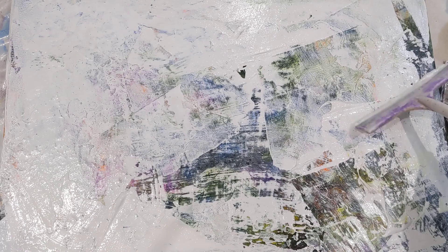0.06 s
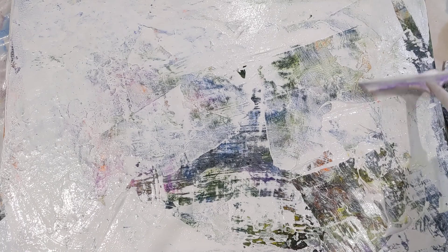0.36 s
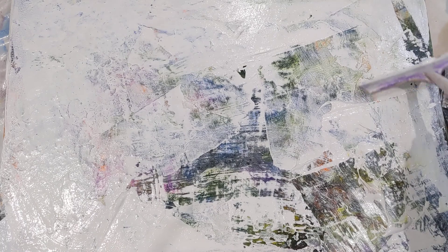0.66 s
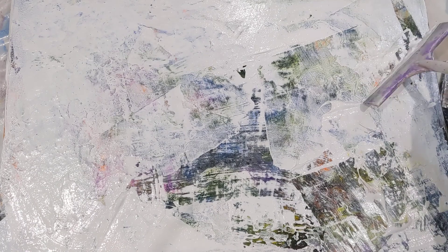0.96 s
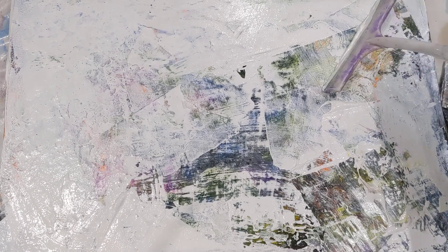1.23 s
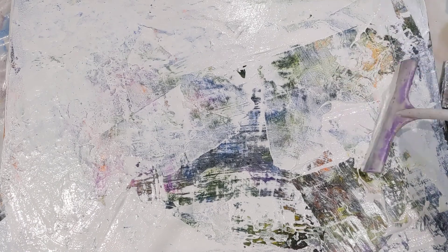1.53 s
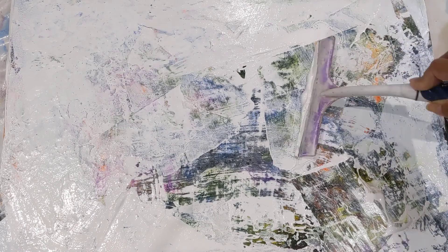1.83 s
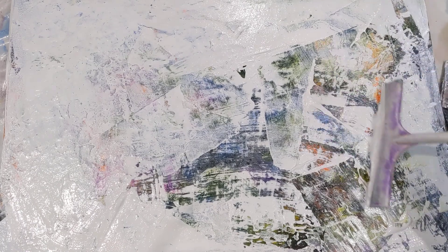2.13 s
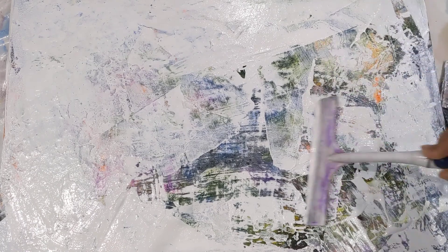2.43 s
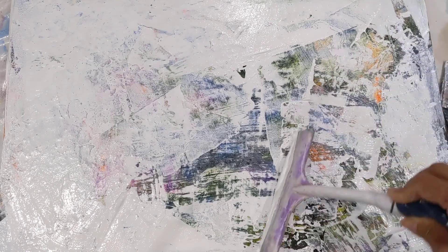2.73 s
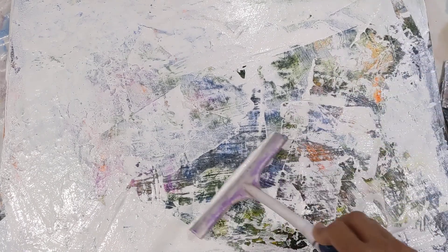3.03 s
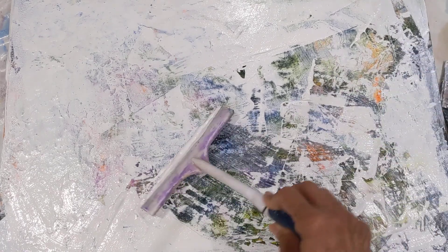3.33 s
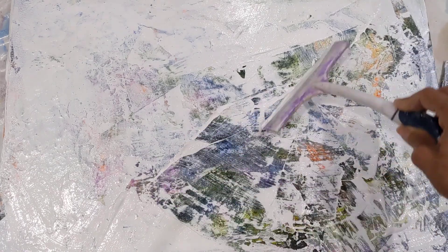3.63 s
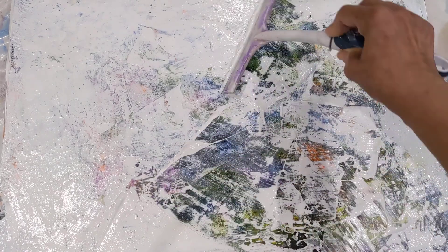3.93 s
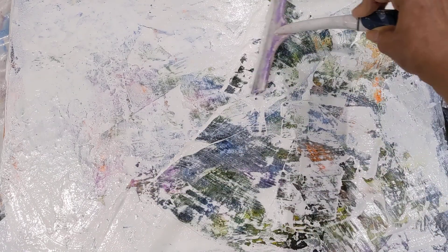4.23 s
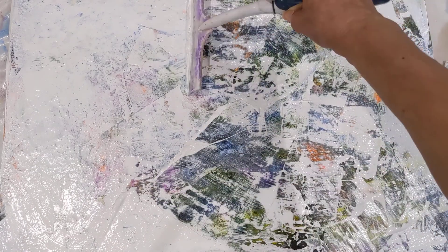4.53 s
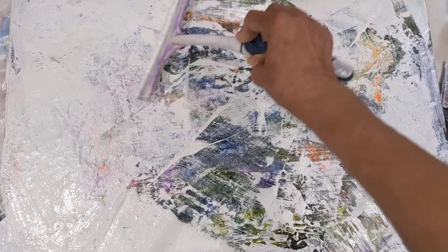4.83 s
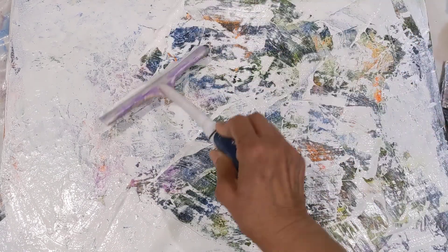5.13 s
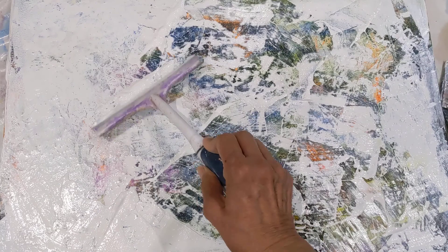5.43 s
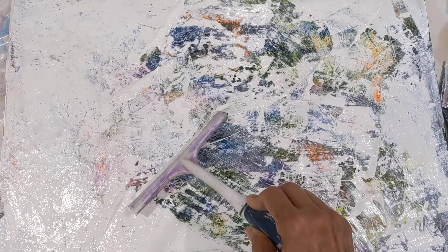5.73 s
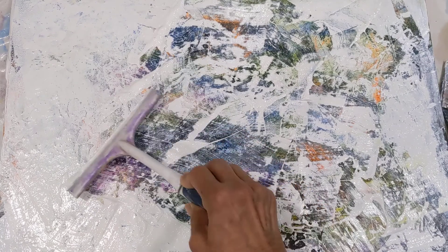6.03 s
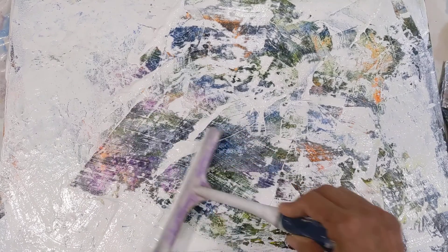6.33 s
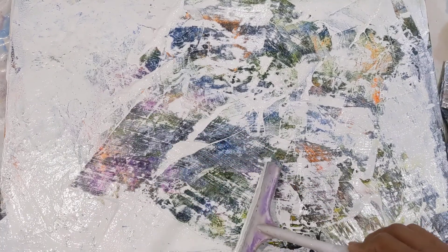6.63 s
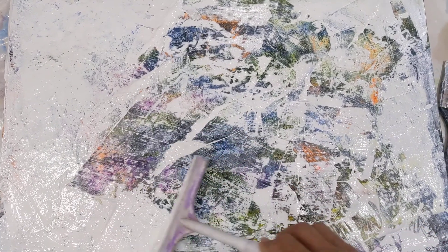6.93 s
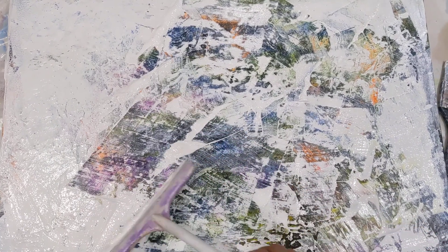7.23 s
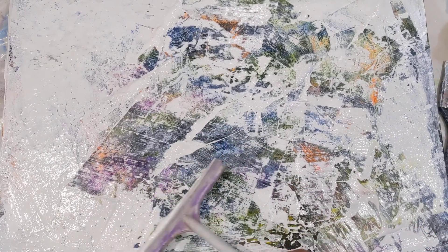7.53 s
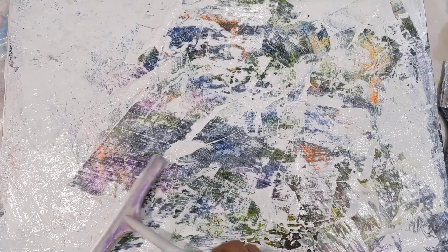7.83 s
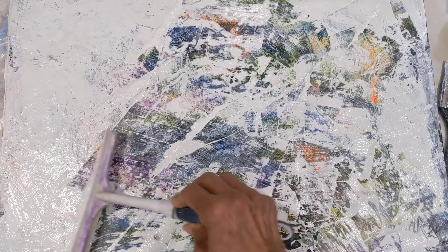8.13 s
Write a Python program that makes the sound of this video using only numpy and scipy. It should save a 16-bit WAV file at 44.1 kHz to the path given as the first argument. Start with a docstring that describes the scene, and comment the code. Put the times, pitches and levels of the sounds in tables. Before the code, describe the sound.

A plastic squeegee drags wet paint over a stretched canvas in quick, uneven strokes, close to the microphone in a small room. Each pull has a gritty rasp, a wet fizz and a low drum-like rumble, with lighter return strokes between. Small snaps and ticks appear from the middle on. Late on, a sharp knock and a second thump come from the canvas, then softer scrapes follow. A lamp buzzes very faintly.

```python
"""Quick, wet scrapes, close by in a small room: a plastic squeegee drags gesso over a stretched canvas.
Stick-slip friction on ridges of paint rings the blade and drives the canvas like a drumhead, while
crushed grit rasps and the tearing wet film fizzes. Paint snaps, and twice the canvas is pushed hard
and thumps on its frame. Behind it all a lamp buzzes faintly at harmonics of twice the mains frequency."""
import sys
import numpy as np
from scipy import signal
from scipy.fft import rfft, irfft
from scipy.io import wavfile
from scipy.ndimage import uniform_filter1d, map_coordinates

SR = 44100
rng = np.random.default_rng(int(sys.argv[2]) if len(sys.argv) > 2 else 0)


def unload_audio(sound):
    """Save the sound as a 16-bit wav file, at the path given as the first command line argument."""
    columns = np.transpose(np.atleast_2d(sound))
    # keep every value between -1 and 1, then stretch to whole-number steps
    steps = np.round(np.clip(columns, -1, 1) * 32767)
    wavfile.write(sys.argv[1], SR, steps.astype(np.int16))


N = 368676
TIME = np.arange(N) / SR
SIDES = np.array([[1], [-1]])  # left, right


def undb(db):
    """Amplitude ratio of a level in decibels."""
    return 10 ** (np.asarray(db) / 20)


def unit(x):
    """Normalisation to unit rms."""
    return x / np.sqrt(np.mean(x ** 2))


def highpass(x, hz):
    """Fourth-order Butterworth high-pass."""
    return signal.sosfilt(signal.butter(4, hz, "high", fs=SR, output="sos"), x)


def colour(x, points):
    """Minimum-phase filter through (frequency [Hz], gain [dB]) points, by folding the cepstrum."""
    size = 4096
    hz, db = np.transpose(points)
    bin_hz = np.arange(size // 2 + 1) * SR / size
    gain = undb(np.interp(np.log(bin_hz + 1), np.log(hz), db))
    cepstrum = irfft(np.log(gain))
    cepstrum[1:size // 2] *= 2
    cepstrum[size // 2 + 1:] = 0
    return signal.oaconvolve(x, irfft(np.exp(rfft(cepstrum))))[:len(x)]


def ring(modes):
    """Modal impulse response: a sum of damped sinusoids."""
    t = TIME[:SR // 2]
    return sum(undb(db) * np.sin(2 * np.pi * hz * t) * np.exp(-np.log(1000) * t / t60)
               for hz, db, t60 in modes)


def add(out, s, x, db):
    """Superposition of x on the track at time s, with peak level db."""
    start = int(s * SR)
    out[start:start + len(x)] += (x * undb(db) / np.abs(x).max())[:N - start]


def clicks(per_s, spread_db=3):
    """Poisson impulses, many small and a few large."""
    occurs = rng.random(N) < per_s / SR
    size = np.minimum(rng.exponential(size=N), 4)
    return occurs * undb(spread_db * size) * rng.choice([-1, 1], N)


def steady(x, span_s):
    """Running rms normalisation: the hand evens the force over span_s; faster unevenness stays."""
    width = int(span_s * SR)
    power = uniform_filter1d(uniform_filter1d(x ** 2, width), width)
    return x / np.sqrt(np.abs(power) + 1e-4 * power.mean())


# spectrum of the quiet room: (frequency [Hz], relative level [dB])
AIR_SPECTRUM = [(18, -70.5), (30, -9), (59, 10), (88, -0.5), (324, -1), (389, -4), (808, -11.5),
                (1050, -15.5), (1440, -14.5), (1910, -15.5), (2550, -16), (3150, -14), (3590, -22),
                (3880, -18), (15500, -29.5)]


def room_air():
    """Partly coherent noise, more alike on the two sides at low frequencies."""
    mid, side = (colour(rng.standard_normal(N), AIR_SPECTRUM) for _ in range(2))
    side = colour(side, [(100, -3), (600, -9), (1300, 1), (15000, 0.5)])
    return undb(-62.5) * (mid + side * SIDES) / np.std(mid)


# partials of the lamp: (nominal frequency [Hz], relative level [dB])
LAMP_PARTIALS = [(1680, -82), (1798, -80), (2401, -79), (2519, -77), (2638, -79), (2762, -84), (2998, -80),
                 (3483, -79), (3720, -84), (4081, -79), (4441, -90), (4560, -83), (4802, -88), (5163, -87),
                 (5281, -90), (6002, -89)]


def lamp_buzz():
    """Harmonics of twice the mains frequency, in quadrature between the two sides."""
    buzz, fundamental_hz = 0, 120
    for hz, db in LAMP_PARTIALS:
        harmonic_hz = fundamental_hz * round(hz / fundamental_hz)
        phase = 2 * np.pi * rng.random() + SIDES * rng.choice([-1, 1]) * np.pi / 4
        buzz += undb(db) * np.sin(2 * np.pi * harmonic_hz * TIME + phase)
    return undb(6.5) * buzz


# spectrum of the reflections: (frequency [Hz], gain [dB])
REFLECTIONS = [(300, -17.5), (420, -23), (530, -39), (660, -1.5), (1000, -4), (2000, -3), (3500, 3),
               (7000, -0.5), (15000, -3.5)]
# excess of the left side over the right: (frequency [Hz], gain [dB])
LEFT_EXCESS = [(1000, 1), (4500, 2), (7000, 0.5), (9500, 7.5), (11500, 8), (16000, 17)]
# effect of the blade's position: (time [s], left lag [ms], edge gain [dB], frame gain [dB])
BLADE_PATH = [(0, -0.15, -2, -2.5), (1.8, -0.095, -6.5, -9.5), (3.2, -0.0018, -16, -13.5),
              (3.9, 0.054, 0, -39), (4.7, -0.0014, -10, -28), (6, 0.12, -2.5, -22.5), (7, 0.16, -20, -29),
              (8.36, 0.17, -3, -15)]


def small_room(x, t60_s, wet_db):
    """Unequal paths delay the direct sound between the sides; diffuse reflections follow."""
    path_s, lag_ms, *_ = np.transpose(BLADE_PATH)
    lag = np.interp(TIME, path_s, lag_ms) * SR / 1000
    t = TIME[:SR // 2]
    walls, table = np.exp(-np.log(1000) * t / t60_s), np.exp(-t / 0.0045)
    fade = (t > .0015) * (walls + table)
    channels = []
    for side in (1, -1):
        direct = map_coordinates(x, [np.arange(N) - side * lag / 2], order=3)
        tail = unit(rng.standard_normal(len(t)) * fade) / np.sqrt(len(t))
        tail = highpass(colour(tail, REFLECTIONS), hz=119)
        heard = direct + undb(wet_db) * signal.fftconvolve(x, tail)[:N]
        channels.append(colour(heard, [(hz, side * db / 2) for hz, db in LEFT_EXCESS]))
    return np.array(channels)


# paint snaps and plastic ticks: (time [s], peak level [dB], centre [Hz], bandwidth [Hz], decay [ms])
PAINT_SNAPS = [(3.045, -41.5, 11800, 4000, 8), (3.544, -46.5, 7880, 11000, 4.9),
               (3.596, -45, 7960, 11000, 5), (3.945, -38.5, 3200, 3000, 14), (3.979, -36, 10000, 8000, 1.5),
               (4.889, -40, 9300, 5000, 4.7), (5.260, -42, 5700, 1800, 1.8), (5.261, -40, 2460, 2000, 3.8),
               (5.344, -36, 10000, 5000, 1.6), (5.553, -31.5, 6900, 11800, 2),
               (5.554, -35.5, 2270, 1500, 2.4), (5.946, -37.5, 11400, 4000, 4.4),
               (6.042, -33.5, 5200, 4000, 1.8), (6.167, -36.5, 2440, 1200, 1.8),
               (6.52, -25, 6900, 11000, 7.5), (6.527, -21.5, 2530, 2160, 3.6),
               (6.531, -26.5, 895, 1150, 14), (6.954, -25.5, 4400, 4500, 1.3),
               (7.095, -36.5, 12000, 6000, 3), (7.797, -43, 11100, 9000, 2.7)]


def snaps():
    """Transient excitation: a click and its brief crackle pass through a resonance."""
    out, t_ms = np.zeros(N), TIME[:SR // 5] * 1000
    for s, db, hz, width_hz, decay_ms in PAINT_SNAPS:
        burst = rng.standard_normal(len(t_ms)) * np.exp(-t_ms / decay_ms)
        burst[0] = 7  # the click
        resonance = signal.iirpeak(hz, hz / width_hz, fs=SR)
        add(out, s, signal.lfilter(*resonance, signal.lfilter(*resonance, burst)), db)
    return out


# modes of the slack canvas: (frequency [Hz], relative level [dB], T60 [s])
CANVAS_MODES = [(66, -16.5, 0.48), (78, -7, 0.18), (142.8, -1.5, 0.15), (149.1, -9, 0.39),
                (180.8, -4.5, 0.25), (208.7, -1.5, 0.13), (240, -13.5, 0.092), (335.4, 3.5, 0.064),
                (402, -12.5, 0.057), (443, 4.5, 0.081)]
# the canvas bumps its frame or springs back: (time [s], peak level [dB], contact time [ms])
CANVAS_THUMPS = [(0.515, -40, 4.2), (0.751, -44, 1.6), (0.809, -49, 3.8), (0.851, -41, 6.7),
                 (1.166, -32.5, 1.55), (2.273, -46.5, 2.5), (2.575, -41, 3.7), (5.36, -34, 2.6),
                 (6.102, -31.5, 2.8), (6.529, -11.5, 0.87), (6.543, -7.5, 2.5), (6.558, -18.5, 8.5),
                 (7.022, -14, 1.9), (7.034, -19, 1.75), (7.056, -19.5, 4.7), (7.143, -24, 2.9)]


def thumps():
    """Impact on a membrane: the longer the half-sine push, the duller the thud."""
    out = np.zeros(N)
    canvas = highpass(ring(CANVAS_MODES), hz=70.5)  # the open back cancels the deep bass
    for s, db, contact_ms in CANVAS_THUMPS:
        push = np.sin(np.pi * np.minimum(TIME[:SR // 20] * 1000 / contact_ms, 1))
        add(out, s, signal.fftconvolve(push, canvas), db)
    return out


def canvas_rumble(slips, pressure):
    """Forced vibration of a membrane: pressure raises its tension and so the pitch of every mode."""
    # soft paint passes only the slow part of each jerk
    force = colour(slips, [(40, -17), (70, -7), (130, 8), (220, 9), (450, -7), (1500, -53)])
    pitch_ratio = 0.87 + 0.254 * pressure
    phase_per_hz, out = 2 * np.pi * np.cumsum(pitch_ratio) / SR, 0
    for hz, db, t60 in CANVAS_MODES:
        phasor = np.exp(1j * hz * phase_per_hz)
        pole = np.exp(-np.log(1000) / (t60 * SR))
        out += undb(db) * (phasor * signal.lfilter([1], [1, -pole], force / phasor)).imag
    return steady(out, span_s=0.067)


# damped modes of the squeegee's body and thin edge: (frequency [Hz], relative level [dB], T60 [s])
BODY_MODES = [(447, -23, 0.031), (476.3, 12.5, 0.046), (503, 6.5, 0.057), (1020, -38, 0.045),
              (1062, -16, 0.086), (1183, -19, 0.043), (1550, -28, 0.076)]
EDGE_MODES = [(559.3, 26, 0.042), (603, 12, 0.085), (720, -38, 0.034)]
# spectrum of crushed grit: (frequency [Hz], relative level [dB])
GRIT_SPECTRUM = [(400, -15), (800, -2), (1400, 4.5), (2000, -2.5), (2800, -3.5), (4000, -14.5), (6000, -15),
                 (10000, -23), (16000, -15.5)]
# the blade catches on a ridge: (time [s], relative peak level [dB], chatter decay [ms])
RIDGE_CATCHES = [(0.094, -31, 0.95), (0.739, -23.5, 3), (1.198, -19.5, 1.1), (1.613, -35.5, 2.2),
                 (1.684, -25, 1.7), (1.738, -16.5, 2.1), (1.762, -16, 3.8), (1.808, -24.5, 11),
                 (1.832, -17, 1.9), (1.870, -28, 3), (2.266, -48, 1.4), (2.419, -25, 1.1),
                 (2.553, -17.5, 0.89), (3.165, -22, 2.2), (3.261, -25.5, 2.2), (3.729, -30.5, 0.9),
                 (3.781, -19.5, 4.5), (3.979, -18, 6), (4.147, -39, 2.2), (4.356, -18.5, 0.77),
                 (4.404, -22, 3), (4.782, -33, 1.3), (4.885, -15, 1.4), (4.952, -24.5, 1.4),
                 (5.251, -39, 3.4), (5.345, -15, 0.3), (5.492, -40, 1.7), (5.7, -40.5, 2.2),
                 (6.046, -18, 2.9), (6.067, -13, 3.8), (7.8, -37, 4.5)]


def catches():
    """Resonant chatter: eight fading slips in step with the blade's ring crack grit and shake canvas."""
    out, canvas = np.zeros(N), ring(CANVAS_MODES)
    blade = highpass(ring(BODY_MODES) + undb(-18) * ring(EDGE_MODES), hz=183)
    t = TIME[:len(blade)]
    for s, db, chatter_ms in RIDGE_CATCHES:
        slips = np.zeros(SR // 20)
        slip_s = np.arange(8) * rng.uniform(.0019, .0022)
        slips[(slip_s * SR).astype(int)] = np.exp(-slip_s * 1000 / chatter_ms)
        crack = colour(rng.standard_normal(len(t)) * np.exp(-t / 0.001), GRIT_SPECTRUM)
        response = blade + undb(-12.5) * canvas + undb(-21) * crack
        add(out, s + 0.001047, signal.fftconvolve(slips, response), db - .5)
    return out


def sticking(hold_s, depth):
    """Static friction holds the blade back just before each catch, so the gain dips."""
    held = np.zeros(N)
    for s, *_ in RIDGE_CATCHES:
        held[int((s - hold_s) * SR):int(s * SR)] = 1
    return 1 - depth * uniform_filter1d(held, size=130)


# modes of the wooden frame: (frequency [Hz], relative level [dB], T60 [s])
FRAME_MODES = [(253, -10, 0.045), (332, 11, 0.058), (897, 1.5, 0.038), (975, -7, 0.11)]


def blade_drag(slips):
    """Modal excitation: slips ring the blade, and the frame too when the blade runs near it."""
    path_s, _, *gains_db = np.transpose(BLADE_PATH)
    edge_gain, frame_gain = (undb(np.interp(TIME, path_s, db)) for db in gains_db)
    jerks = highpass(slips, hz=281)
    body, edge, frame = (unit(signal.oaconvolve(jerks, ring(modes)[:SR // 10])[:N])
                         for modes in (BODY_MODES, EDGE_MODES, FRAME_MODES))
    return steady(body + edge_gain * edge + frame_gain * frame, span_s=0.081)


# heavy pulls and light returns, with the relative level of each layer: (time of full pressure [s],
# attack [s], hold [s], release [s], drag [dB], rumble [dB], rasp [dB], fizz [dB])
HAND_STROKES = [(0.0, .05, 0.063, 0.098, -47.5, -41, -57, -64),
                (0.17, 0.046, 0.092, 0.091, -62, -58, -66, -71),
                (0.387, 0.099, .1, 0.039, -50.5, -40, -70, -59.5),
                (0.605, .05, 0.022, .06, -57, -63, -71, -69),
                (0.755, 0.069, 0.065, 0.066, -35.5, -31.5, -58, -58.5),
                (0.949, .06, 0.047, 0.078, -58.5, -55, -69, -68),
                (1.17, 0.091, 0.086, 0.071, -33, -40.5, -53.5, -58),
                (1.435, 0.064, 0.11, .1, -72, -58, -70, -75),
                (1.763, 0.18, 0.095, 0.086, -29.5, -36.5, -50, -58.5),
                (2.498, 0.2, 0.064, 0.09, -31.5, -35, -58, -62.5),
                (2.921, 0.046, 0.33, 0.16, -37.5, -39.5, -52.5, -61),
                (3.552, 0.1, 0.11, 0.18, -56.5, -60.5, -63.5, -69.5),
                (3.789, 0.099, .18, 0.086, -32, -45, -48, -60.5),
                (4.133, 0.1, 0.059, 0.042, -55, -59, -62, -68),
                (4.375, 0.16, 0.15, 0.096, -34, -47, -52, -64.5),
                (4.877, 0.17, 0.053, 0.078, -34.5, -41, -53, -61),
                (5.014, 0.089, 0.049, 0.11, -56, -67, -61, -68),
                (5.116, .05, 0.28, 0.11, -57.5, -54.5, -68, -75.5),
                (5.458, .06, 0.27, 0.12, -62.5, -61, -67.5, -74.5),
                (5.984, 0.13, 0.074, 0.13, -34, -40.5, -47, -62),
                (6.162, 0.077, .06, 0.11, -65, -60, -69, -67),
                (6.362, 0.056, 0.03, 0.14, -59, -69, -64, -68),
                (6.523, 0.049, 0.012, 0.12, -39.5, -27, -45.5, -54),
                (6.898, 0.21, 0.14, 0.14, -37.5, -31.5, -47, -58),
                (7.586, 0.073, .16, 0.034, -52, -47, -58.5, -71.5),
                (7.853, 0.082, 0.032, 0.19, -46.5, -40, -58, -65.5),
                (8.25, 0.18, 0.31, .1, -44.5, -40, -55.5, -65.5)]


def stroke_gain(levels_db, attack_db, push_db, release_db, fade_db_per_s=np.inf):
    """Incoherent strokes add in power: each swells, grows as the hand speeds up, and dies on lifting."""
    t, power = TIME[::64], 0
    ease = 1.33  # above one, the hand eases into and out of full pressure
    for (s, attack_s, hold_s, release_s, *_), db in zip(HAND_STROKES, levels_db):
        before, after = np.maximum(s - t, 0), np.maximum(t - s - hold_s, 0)
        swell = -attack_db * (before / attack_s) ** ease
        push = push_db * (np.clip((t - s) / hold_s, 0, 1) - .5)
        lift = -np.minimum(release_db * (after / release_s) ** ease, fade_db_per_s * (after + 1 / SR))
        power += undb(db + swell + push + lift) ** 2
    return np.interp(TIME, t, np.sqrt(power))


# spectrum of the tearing wet film: (frequency [Hz], relative level [dB])
FILM_SPECTRUM = [(1500, 15.5), (3500, 4.5), (5500, 2), (8000, 1), (10000, 4.5), (11500, 10), (13500, 4),
                 (16000, -28)]


def scrape():
    """Stick-slip friction: the same jerks drive blade and canvas, crush grit and tear the wet film."""
    drag_db, rumble_db, rasp_db, fizz_db = np.transpose(HAND_STROKES)[4:]
    drag = stroke_gain(drag_db, attack_db=32.8, push_db=0.5, release_db=26.8)
    rumble = stroke_gain(rumble_db, attack_db=24.5, push_db=4.2, release_db=11.4, fade_db_per_s=135)
    rasp = stroke_gain(rasp_db, attack_db=24.5, push_db=1.5, release_db=20)
    fizz = stroke_gain(fizz_db, attack_db=18.6, push_db=0.73, release_db=21.6)
    pressure = uniform_filter1d(fizz / (fizz + undb(-66)), size=2000)  # 0 lifted, toward 1 pressed
    slips = clicks(per_s=950)
    blade, canvas = blade_drag(slips), canvas_rumble(slips, pressure)
    # each slip briefly strengthens the clicks of grit and film
    crush = unit(signal.lfilter([1], [1, -np.exp(-1 / (0.0054 * SR))], np.abs(slips)))
    grit = steady(colour(clicks(per_s=6000) * (1.8 + crush), GRIT_SPECTRUM), span_s=0.13)
    film = steady(colour(clicks(per_s=4500) * (0.47 + crush), FILM_SPECTRUM), span_s=0.031)
    friction = sticking(hold_s=.013, depth=.55) * (undb(1) * drag * blade + undb(-4) * rasp * grit)
    return friction + undb(-4) * rumble * canvas + undb(4) * fizz * film


def scene():
    """Superposition of the squeegee's work in the room, the air and the lamp."""
    work = scrape() + catches() + thumps() + snaps()
    return small_room(work, t60_s=0.19, wet_db=1.5) + room_air() + lamp_buzz()


def record(dry):
    """Band limiting removes the deepest bass and the highest treble."""
    top_hz = 15700
    lowpass = signal.ellip(12, .2, 80, top_hz, fs=SR, output="sos")
    return signal.sosfilt(lowpass, highpass(dry, hz=52))


dry = scene()
out = record(dry)
unload_audio(out)
```